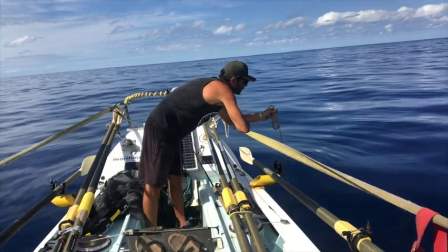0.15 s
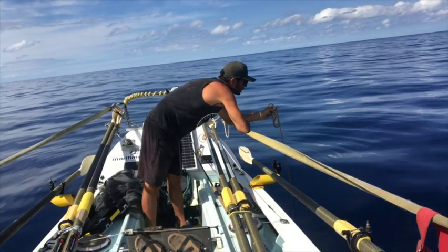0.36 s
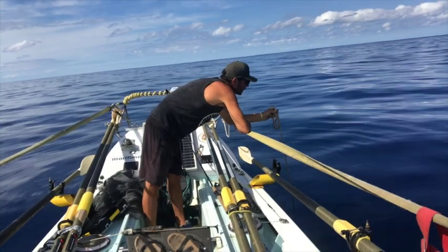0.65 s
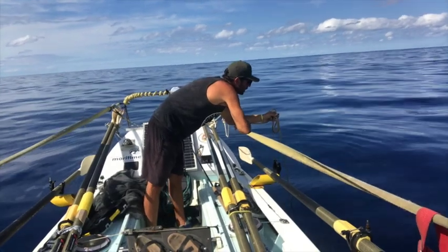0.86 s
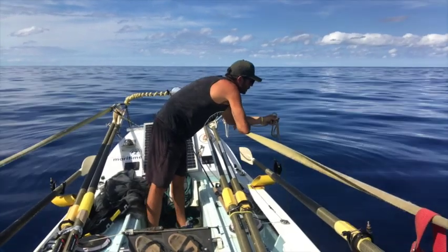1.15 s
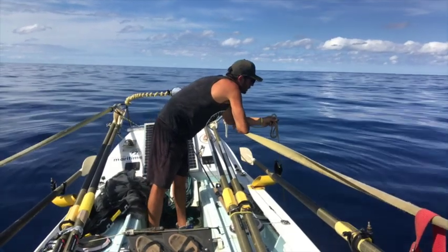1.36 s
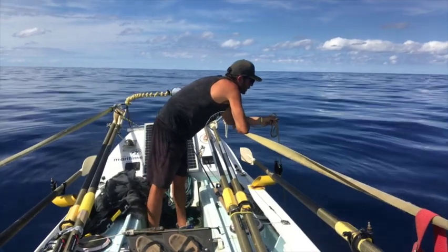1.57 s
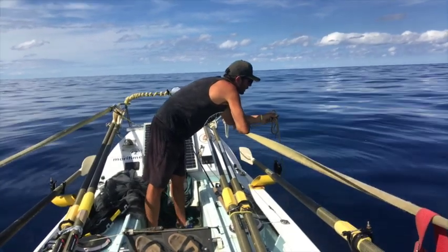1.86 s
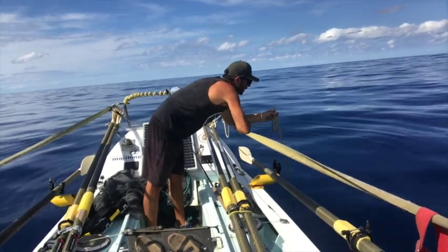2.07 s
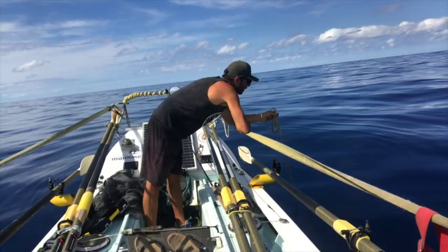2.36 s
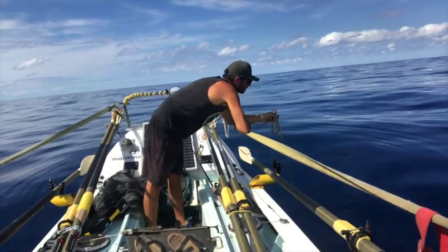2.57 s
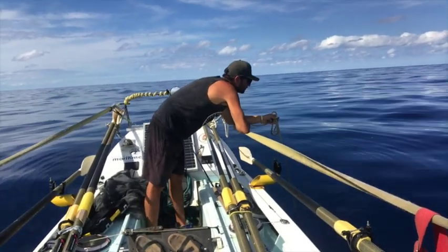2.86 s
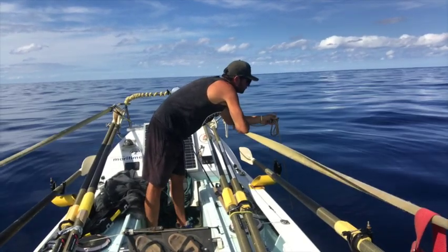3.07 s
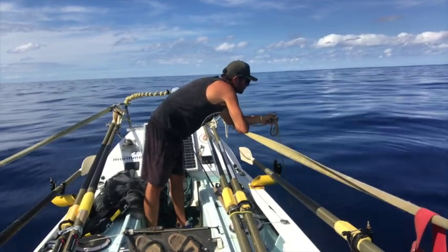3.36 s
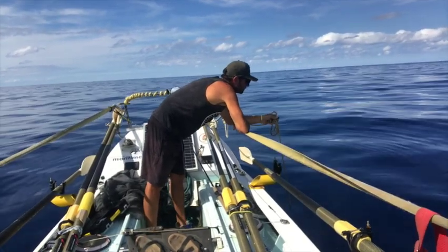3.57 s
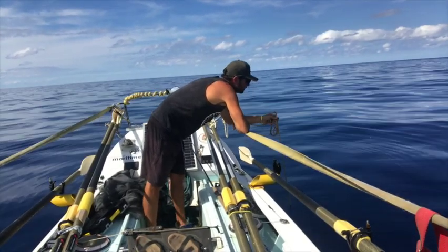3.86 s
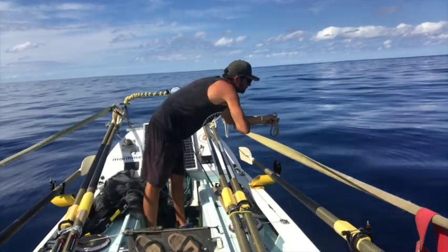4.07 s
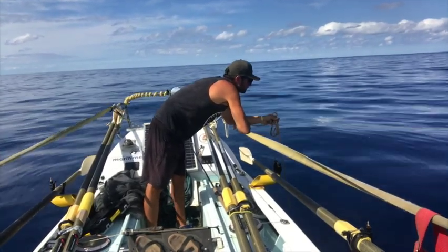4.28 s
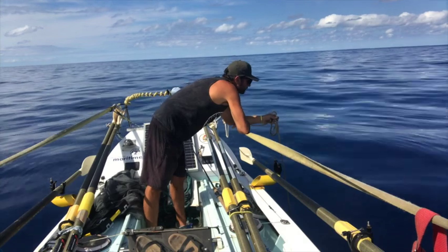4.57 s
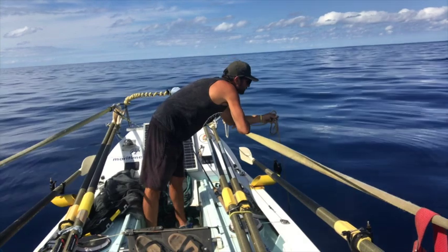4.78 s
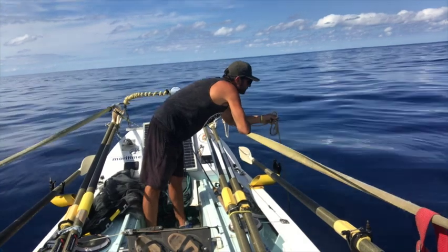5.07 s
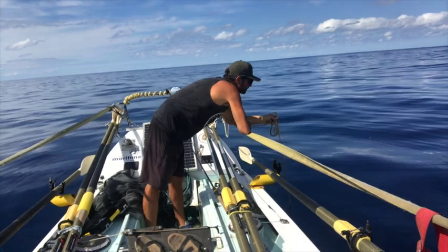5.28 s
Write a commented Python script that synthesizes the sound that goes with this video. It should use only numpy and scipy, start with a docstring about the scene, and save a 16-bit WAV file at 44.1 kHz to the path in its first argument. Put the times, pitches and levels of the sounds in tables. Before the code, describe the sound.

A small hollow boat rocks on calm open water, heard up close with no echo. Very faint wash and smooth hiss run throughout, the top treble cut off. Barely audible laps open the scene, then a rounded double thump at 0.6 s with a deep soft boom beneath. Another cluster of slaps comes at 1.4 s, with wet ticks and low booming, and a bright droplet plink at 1.8 s. It is nearly still until 2.7 s, when a quick run of hollow slaps arrives. Thumps at 3.4 and 3.9 s follow, with a hard, short, rattly knock from a loose fitting at 3.6 s. Busy lapping fills 4.0 to 4.4 s, with splashy ticks and a weaker knock at 4.24 s. The strongest low double thump lands at 4.83 s with a gurgle and trailing slaps, then a sharp clack at 5.04 s, a faint one just after, and fading water.

```python
"""Small boat rocking on a calm sea

Wavelets slap a small hollow hull: a smooth push rings its panels, with a short noise splat, and its air
space booms as a low swelling sine. A loose hard fitting now and then knocks as a crack, ringing modes and
a noise rattle. Spray ticks in short noise bursts; plinks and low gurgles are clusters of climbing sines.
Behind them lie a faint wash that follows the slosh and a smooth microphone hiss, both banded noise."""
import sys
import numpy as np
from scipy import signal
from scipy.io import wavfile

SR = 44100
rng = np.random.default_rng(int(sys.argv[2]) if len(sys.argv) > 2 else 0)


def pcm_store(signal):
    """Save signal as 16-bit PCM."""
    levels = np.round(np.clip(np.atleast_2d(signal), -1, 1) * 32767)
    wavfile.write(sys.argv[1], SR, levels.astype(np.int16).T)


N = 238746   # length of the scene, samples
T = np.arange(SR // 2) / SR   # time within one event, s


def from_db(db):
    """Decibels to gain."""
    return 10 ** (np.asarray(db) / 20)


def peak_one(x):
    """Scale a sound so that its largest swing is 1."""
    return x / (np.max(np.abs(x)) + 1e-20)


def add(out, start_s, sound):
    """Mix a sound in at a time, cut at the end of the scene."""
    i = round(start_s * SR)
    out[i:i + len(sound)] += sound[:N - i]


def ring(push, hz, t60_s):
    """One resonant mode driven by a push; a unit click sets a decaying sine of starting height 1 ringing."""
    radius = from_db(-60 / (t60_s * SR))
    angle = 2 * np.pi * hz / SR
    return signal.lfilter([0, np.sin(angle)], [1, -2 * radius * np.cos(angle), radius ** 2], push)


def band(x, hz, octaves):
    """Band-pass of a width in octaves around a centre."""
    edges = hz * 2 ** (np.array([-.5, .5]) * octaves)
    return signal.sosfilt(signal.butter(2, edges, "band", fs=SR, output="sos"), x)


def drift(rate_hz):
    """Slow random wander of spread 1: noise through two equal low-pass poles."""
    step = 40   # made at a low rate, then interpolated
    pole = np.exp(-2 * np.pi * rate_hz * step / SR)
    noise = rng.standard_normal(N // step + 2002)
    slow = signal.lfilter([1], [1, -2 * pole, pole ** 2], noise)[2000:]   # past the filter's start
    return np.interp(np.arange(N) / step, np.arange(len(slow)), slow / np.std(slow))


def slaps():
    """A smooth water push rings the panels near the struck spot; its rough edge adds a short bright splat."""
    # wavelets on the hull: start_s, thump_level_db (peak), centre_hz (of the struck panels)
    wavelets = [(0.014, -48.5, 166), (0.035, -49, 426), (0.296, -42.5, 172), (0.331, -47, 166),
                (0.407, -47.5, 208), (0.579, -30, 300), (0.592, -30, 295), (1.085, -43.5, 175),
                (1.384, -34.5, 223), (1.394, -35.5, 310), (1.408, -37.5, 200), (1.997, -49, 158),
                (2.075, -47.5, 262), (2.682, -30.5, 218), (2.694, -32.5, 500), (2.706, -35, 396),
                (2.722, -40, 348), (2.743, -37.5, 139), (2.849, -39.5, 415), (3.005, -42, 246),
                (3.02, -44, 143), (3.424, -30, 201), (3.44, -35, 168), (3.861, -29, 245),
                (3.874, -36.5, 152), (3.956, -42, 208), (3.973, -41.5, 342), (4.047, -38, 240),
                (4.057, -37, 430), (4.076, -48, 334), (4.09, -45.5, 205), (4.195, -46.5, 276),
                (4.216, -40.5, 326), (4.344, -32.5, 304), (4.354, -31.5, 365), (4.373, -37, 374),
                (4.389, -45, 148), (4.425, -48.5, 150), (4.826, -24.5, 201), (4.842, -23, 150),
                (4.869, -40, 137), (4.889, -41, 178), (4.91, -36.5, 199), (4.93, -32.5, 137),
                (4.946, -36.5, 159), (4.974, -56, 206), (5.124, -45, 180), (5.147, -49.5, 155)]
    # hull panels: pitch_hz, level_db, t60_s (before the water damps them)
    panels = [(127.5, 4, 0.088), (155.7, -4, 0.26), (172.7, -0.5, 0.24), (218, -2, 0.19), (249.4, 0, 0.12),
              (300.2, 1, 0.14), (332.7, 1.5, 0.12), (398.8, 2.5, 0.15), (456.3, 2, 0.091),
              (520.6, 6.5, 0.067), (590.4, 2, 0.11), (736, -0.5, 0.045)]
    push_s, splat_db = 0.015, -20   # push length; splat under the thump
    damped_share = 0.74   # share of the ring time left by the water
    spread_at_200_hz_oct, spread_slope = 0.64, -0.62   # a smaller, higher spot reaches fewer panels
    out = np.zeros(N)
    push = np.sin(np.pi * np.clip(T / push_s, 0, 1)) ** 2
    splat_shape = (1 - np.exp(-T / 0.004)) * from_db(-60 * T / 0.22)
    for start_s, level_db, centre_hz in wavelets:
        thump = np.zeros(len(T))
        spread_oct = spread_at_200_hz_oct * (centre_hz / 200) ** spread_slope
        for hz, mode_db, t60_s in panels:
            nearness = np.exp(-.5 * (np.log2(hz / centre_hz) / spread_oct) ** 2)
            # each panel is driven at its own pitch, from a random phase
            wobble = np.cos(2 * np.pi * (hz * T + rng.random()))
            strength = nearness * from_db(mode_db + rng.normal(0, 1.98))
            thump += strength * ring(push * wobble, hz, t60_s * damped_share)
        splat = band(rng.standard_normal(len(T)), 500, 1.21) * splat_shape
        slap = peak_one(thump) + from_db(splat_db) * peak_one(splat)
        add(out, start_s - .005, from_db(level_db) * slap)   # the push begins a little early
    return out


def booms():
    """The hull's air space is pushed: it swells up near its one low pitch and dies away."""
    # pushes on the air: start_s (the swell begins 0.01 s ahead), level_db (peak of the swell), t60_s
    pushes = [(0.097, -53, 0.11), (0.317, -54.5, 0.45), (0.442, -46, 0.1), (0.485, -43, 0.097),
              (0.602, -36.5, 0.38), (0.7, -44.5, 0.082), (0.778, -57, 0.14), (1.006, -56, 0.14),
              (1.15, -58, 0.14), (1.405, -39.5, 0.15), (1.481, -46, 0.23), (1.537, -43, 0.11),
              (1.607, -53, 0.13), (1.67, -57, 0.17), (1.808, -55, 0.069), (2.708, -42, 0.35),
              (3.026, -58, 0.47), (3.37, -50, 0.18), (3.449, -49, 0.15), (3.489, -41, 0.091),
              (3.56, -53, 0.073), (3.612, -56, 0.1), (3.699, -64, 0.12), (3.87, -51, 0.67),
              (4.021, -46, 0.15), (4.07, -39, 0.25), (4.181, -52, 0.091), (4.242, -52.5, 0.08),
              (4.839, -59, 0.15), (4.931, -36.5, 0.26), (5.039, -49.5, 0.13), (5.187, -54.5, 0.37)]
    air_hz, scatter_hz, swell_s = 63.5, 1.5, 0.011
    out = np.zeros(N)
    for start_s, level_db, t60_s in pushes:
        shape = (1 - np.exp(-T / swell_s)) ** 2 * from_db(-60 * T / t60_s)
        hz = rng.normal(air_hz, scatter_hz)
        tone = np.sin(2 * np.pi * (hz * T + rng.random()))
        add(out, start_s - .01, from_db(level_db) * peak_one(shape) * tone)
    return out


def knocks():
    """The loose fitting strikes: a dulled click makes a sharp crack and rings modes, with a short rattle."""
    # strikes: start_s, level_db (peak of the crack)
    strikes = [(3.6353, -29.5), (4.2442, -37), (5.0416, -26.5), (5.1014, -50.5)]
    # the fitting and the deck under it: pitch_hz, level_db, t60_s
    fitting_modes = [(286, -10.5, 0.11), (415, -2, 0.15), (457, 2.5, 0.038), (639, 1, 0.082),
                     (850, -9.5, 0.053), (1000, -17, 0.11), (1165, 5, 0.031), (1253, -0.5, 0.062),
                     (1340, -27, .05), (1543, 7.5, 0.015), (1716, -35, 0.054), (1780, -15, 0.015),
                     (2020, -28, 0.07), (1995, 1.5, 0.036), (2050, -50, 0.026), (2316, 4.5, 0.023),
                     (2600, -1.5, 0.02), (2400, -20, 0.028), (2650, -38, 0.073), (3187, -7.5, 0.038),
                     (3310, -15.5, 0.062), (3740, -17, 0.028), (4260, -23, 0.038), (5330, -61, .03)]
    contact_hz = 4400   # low-pass for the dullness of the contact
    modes_db, rattle_db = 1.5, -6.0   # peaks against the crack
    out = np.zeros(N)
    click = (T == 0) * 1.
    hit = signal.lfilter(*signal.butter(2, contact_hz, fs=SR), click)
    crack = peak_one(band(hit, 1900, 1.5))
    for start_s, level_db in strikes:
        strengths_db = rng.normal(0, 1.5, len(fitting_modes))
        modes = np.zeros(len(T))
        for k, (hz, mode_db, t60_s) in enumerate(fitting_modes):
            sign = (-1) ** k   # modes alternate in direction down the table
            modes += sign * from_db(mode_db + strengths_db[k]) * ring(hit, hz, t60_s)
        rattle = band(rng.standard_normal(len(T)), 1480, 0.92) * from_db(-60 * T / 0.056)
        knock = crack + from_db(modes_db) * peak_one(modes) + from_db(rattle_db) * peak_one(rattle)
        add(out, start_s, from_db(level_db) * knock)
    return out


def spray():
    """Spray ticks are short noisy bursts: a wet body around the centre and a fine bright edge."""
    # ticks: start_s (the burst begins 0.001 s ahead), body_level_db (peak), centre_hz,
    # fine_db (gain of the bright edge before the tick's level)
    ticks = [(0.0332, -48, 1000, -20), (0.399, -51.5, 1650, 0.5), (0.583, -49.5, 1090, -14),
             (0.614, -50.5, 1000, -19), (0.658, -63, 1260, 3.5), (0.802, -57, 1240, -16),
             (1.4014, -49, 1000, -23), (1.4224, -43.5, 1120, -11.5), (1.514, -53.5, 1970, -12),
             (1.526, -56, 2380, -15), (1.593, -56.5, 1030, -9), (1.788, -44.5, 900, -30),
             (2.071, -50.5, 1460, -1.5), (2.621, -50, 2870, -28), (2.6942, -45, 880, -26),
             (2.7355, -47, 1340, -28), (2.849, -38.5, 1110, -35), (2.9044, -57, 1000, -8),
             (3.4306, -45.5, 890, -25), (3.5835, -50.5, 1080, -10), (3.868, -54, 1120, -29),
             (3.9236, -54.5, 1000, -24), (3.9666, -53, 1180, -17), (4.0518, -44, 850, -31),
             (4.101, -57, 1300, -20), (4.2136, -35.5, 1090, -28), (4.342, -44.5, 1530, -9.5),
             (4.4236, -54.5, 700, -23), (4.8336, -37, 1090, -35), (4.925, -45.5, 2100, -19),
             (5.0047, -55.5, 1560, -5)]
    swell_s, t60_s = 0.0012, 0.055
    spread_at_1_khz_oct, spread_slope = 1.16, -0.49   # higher ticks are more focused
    out = np.zeros(N)
    shape = (1 - np.exp(-T / swell_s)) * from_db(-60 * T / t60_s)
    for start_s, level_db, hz, fine_db in ticks:
        body_noise, fine_noise = rng.standard_normal((2, len(T)))
        spread_oct = spread_at_1_khz_oct * (hz / 1000) ** spread_slope
        body = peak_one(band(body_noise, hz, spread_oct) * shape)
        fine = peak_one(band(band(fine_noise, 5400, 3.3), 2850, 2.1) * shape)
        add(out, start_s - .001, from_db(level_db) * (body + from_db(fine_db) * fine))
    return out


def plinks():
    """Plinks and low gurgles: clusters of a few detuned sines that climb as they die away."""
    # plinks and gurgles: start_s, level_db (peak), pitch_hz (of the main sine before it climbs)
    clusters = [(1.429, -48, 1114), (1.526, -56, 2910), (1.787, -42, 1695), (1.81, -51.5, 1870),
                (2.516, -58, 1550), (2.54, -61, 2070), (2.58, -62, 1550), (2.77, -63, 2050),
                (2.875, -50, 863), (3.572, -56, 1090), (3.586, -60, 2870), (4.103, -59, 1490),
                (4.35, -55, 4000), (4.376, -59, 3830), (4.844, -42, 396), (4.87, -39, 706),
                (5.373, -62.5, 1180)]
    rise_oct_per_s = 4.5
    t60_at_1_khz_s, t60_slope = .055, -0.39   # higher pitches ring shorter
    out = np.zeros(N)
    onset = 1 - np.exp(-T / 0.00022)
    for start_s, level_db, hz in clusters:
        t60_s = t60_at_1_khz_s * (hz / 1000) ** t60_slope
        climb = 2 * np.pi * np.cumsum(hz * 2 ** (rise_oct_per_s * T)) / SR   # phase, radians
        detune = rng.normal(1, .045, (3, 1))
        start_turn = rng.random((3, 1))
        side_sines = np.sin(climb * detune + 2 * np.pi * start_turn).sum(axis=0)
        cluster = np.sin(climb) + .45 * side_sines
        add(out, start_s, from_db(level_db) * peak_one(cluster * onset * from_db(-60 * T / t60_s)))
    return out


def wash(lumpy_db):
    """Third-octave noise bands; the low ones are lumpy and follow the slosh, the high ones are smooth hiss."""
    # spectrum of wash and hiss: pitch_hz, level_db (per Hz, relative)
    spectrum = [(20, -31), (40, 1.5), (60, -0.5), (110, -1.5), (250, -2), (450, -7.5), (800, -11.5),
                (1400, -17), (2500, -22), (4000, -24), (4900, -26.5), (6000, -23.5), (8000, -29),
                (10300, -36.5), (11400, -65)]
    # water moving along the hull: start_s, level_db (only the change around the mean is used)
    slosh = [(0.0, -62), (0.3, -65.5), (0.53, -60.5), (0.81, -64), (2.27, -64), (3.92, -64), (4.07, -58.5),
             (4.57, -65), (4.87, -62.5), (5.0, -60), (5.15, -64.5), (5.41, -63.5)]
    steady_level_db = -61.5   # rms without slosh and lumps
    slosh_s, slosh_level_db = np.transpose(slosh)
    slosh_db = np.interp(np.arange(N) / SR, slosh_s, slosh_level_db - np.mean(slosh_level_db))
    spectrum_hz, spectrum_db = np.transpose(spectrum)
    white = rng.standard_normal((2, N + SR))   # neighbouring bands take turns between two noises
    together = drift(11)   # lumps shared by all bands
    steady, moving = np.zeros(N), np.zeros(N)
    for k, centre_hz in enumerate(25 * 2 ** np.arange(0, 9.2, 1 / 3)):
        band_db = np.interp(np.log(centre_hz), np.log(spectrum_hz), spectrum_db)
        noise = band(white[k % 2], centre_hz, 1 / 3)[SR:] * from_db(band_db)   # skip the filter's start
        watery = 1 / (1 + (centre_hz / 1500) ** 2)   # how far the band moves with the water
        lumps_db = lumpy_db * (0.29 * together + 1.94 * drift(11))
        steady += noise
        moving += noise * from_db(watery * (slosh_db + lumps_db))
    return from_db(steady_level_db) * moving / np.std(steady)


def scene():
    """Everything reaches one microphone."""
    return (slaps() + booms() + knocks() + spray() + plinks() + wash(lumpy_db=1.1))[None]


def record(dry):
    """A steep low-pass cuts the top."""
    cutoff_hz = 11330
    steep = signal.ellip(10, 1, 70, cutoff_hz, fs=SR, output="sos")   # 1 dB ripple, 70 dB stop
    return signal.sosfilt(steep, dry)


dry = scene()
out = record(dry)
pcm_store(out)
```